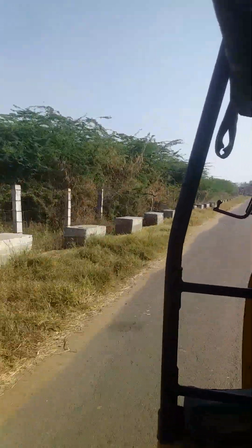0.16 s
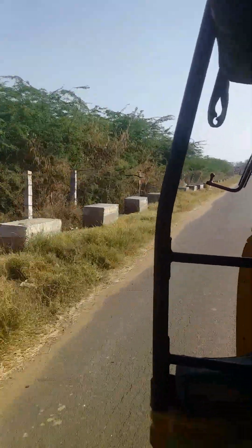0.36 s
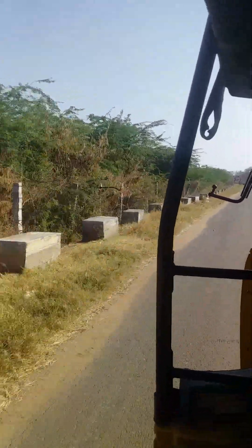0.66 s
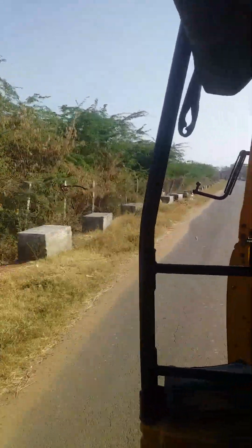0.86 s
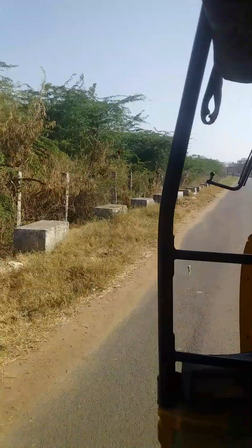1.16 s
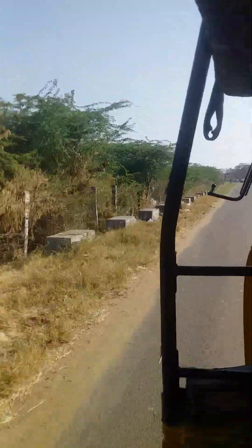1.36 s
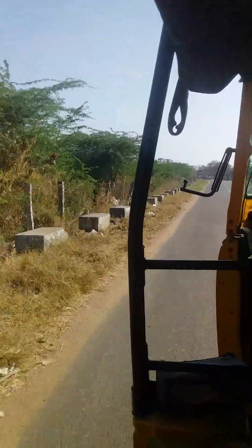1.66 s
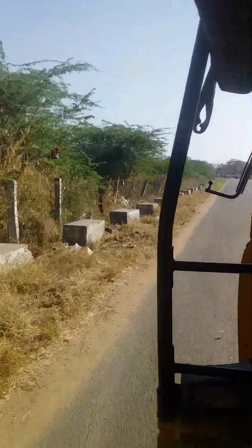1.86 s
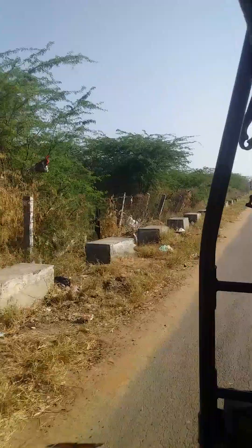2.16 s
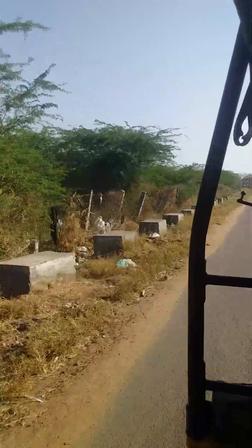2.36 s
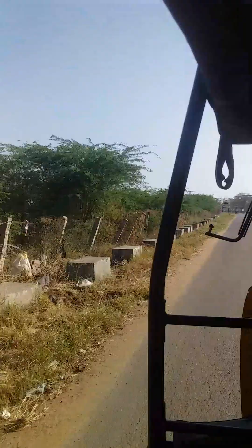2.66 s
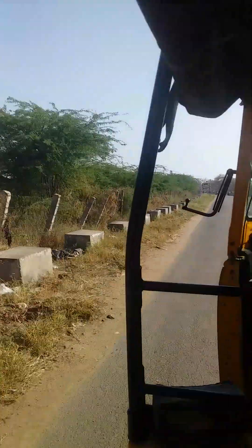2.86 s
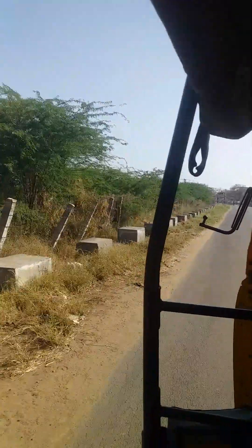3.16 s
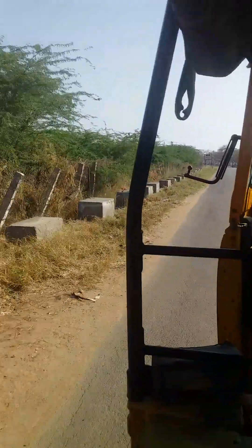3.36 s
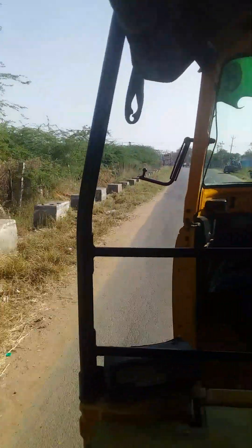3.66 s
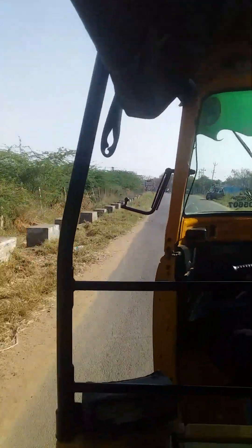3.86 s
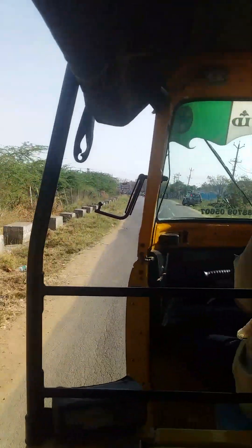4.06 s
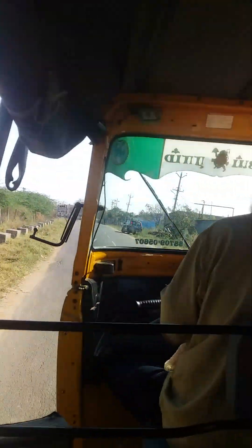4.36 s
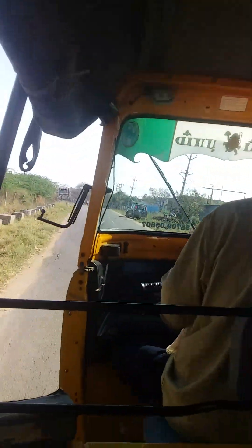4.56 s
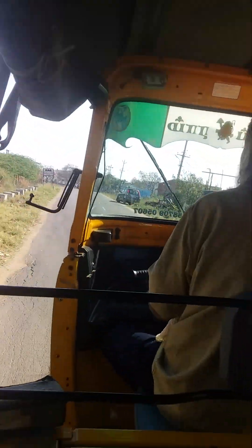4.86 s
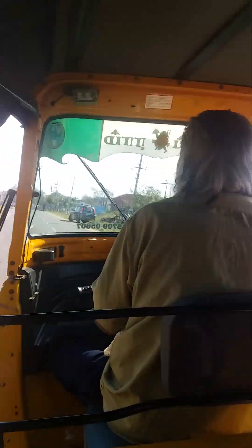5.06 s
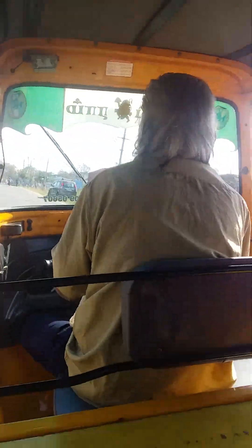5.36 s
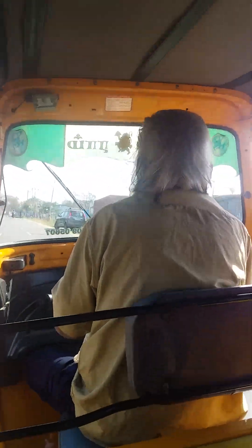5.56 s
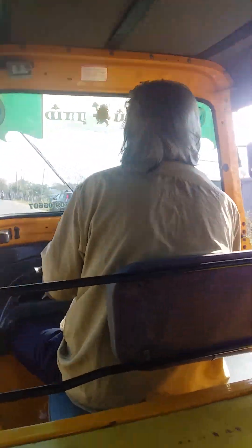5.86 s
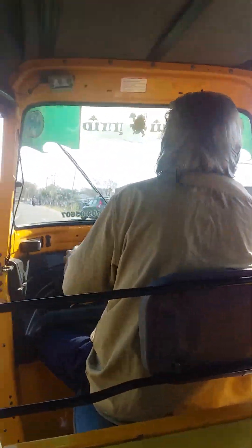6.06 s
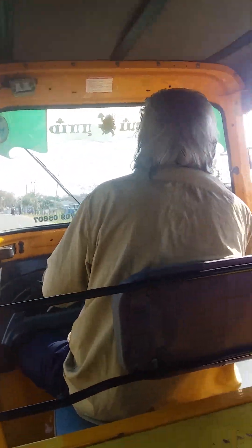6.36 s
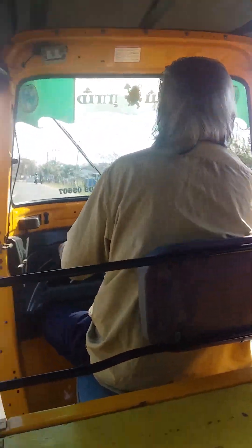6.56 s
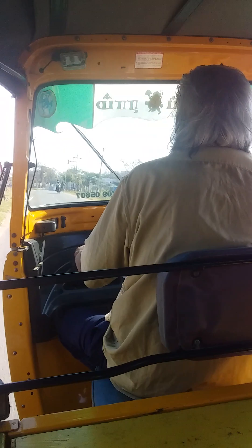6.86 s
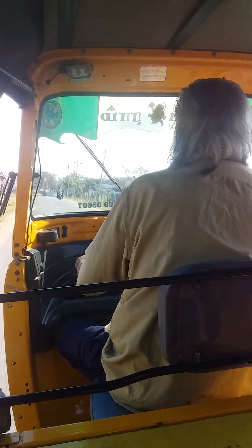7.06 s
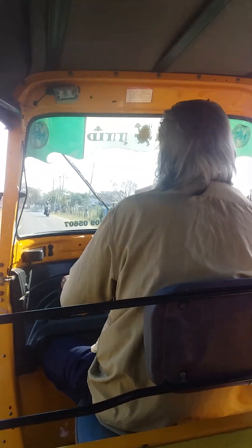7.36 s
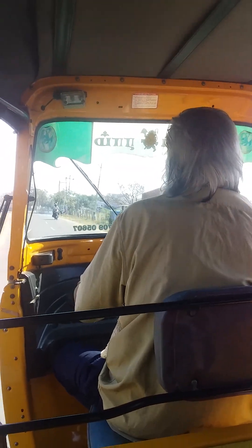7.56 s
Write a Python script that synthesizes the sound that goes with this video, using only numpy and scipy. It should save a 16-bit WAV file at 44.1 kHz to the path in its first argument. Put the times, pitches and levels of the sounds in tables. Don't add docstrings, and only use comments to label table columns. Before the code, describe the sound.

A ride of about 7.7 seconds in an open three-wheeler, heard from the cabin with a bare, close microphone. Throughout, a small single-cylinder engine fires about 23 times a second at nearly constant speed, a low buzzing drone with pulsing valve and gear clatter. Wind is nearest and loudest: a lumpy low rumble broken by abrupt slaps, dull thuds, booms and dry spits. Gusts are busy from 0.4 to 1.6 s, with a deep boom at 1.8, more slaps from 2.2 to 2.8, and a boom near 3.05. Around 4 s, clatter and thin tyre-and-chain hiss rise. Near 5 s come hard, sharp slaps and brighter metallic ticks as the microphone turns towards the panels, which ring more. A strong thump lands at 6.36, then dense buffeting from 6.5 to 7.2. Engine clatter and drone soften slightly at the end, while wind continues. Dry, rough, no reverberation.

```python
import sys
import numpy as np
from scipy import signal
from scipy.fft import rfft, irfft
from scipy.io import wavfile
from scipy.ndimage import uniform_filter1d, minimum_filter1d

SR = 44100
rng = np.random.default_rng(int(sys.argv[2]) if len(sys.argv) > 2 else 0)


def store_pcm(level_fs):
    pcm = np.round(np.clip(level_fs, -1, 1) * 32767).astype(np.int16)
    wavfile.write(sys.argv[1], SR, np.atleast_2d(pcm).T)


def boost_factor(decibels):
    exponent = np.asarray(decibels, float) / 20
    return 10 ** exponent


N = 339129
TIME = np.arange(N) / SR


def rms_one(x):
    return x / np.sqrt(np.mean(x ** 2) + 1e-20)


def at_hz(points, hz):
    point_hz, value = np.array(points).T
    return np.interp(np.log(hz), np.log(point_hz), value)


def drift(rate):
    r = np.exp(-16 * np.pi * rate / SR)
    slow = signal.lfilter([1], [1, -2 * r, r * r], rng.standard_normal(N // 8 + 4002))[4000:]
    return np.interp(np.arange(N) / 8, np.arange(len(slow)), rms_one(slow))


def band(x, low_hz, high_hz):
    return signal.sosfilt(signal.butter(2, [low_hz, high_hz], "band", fs=SR, output="sos"), x)


def low_pass(x, order, hz):
    return signal.sosfilt(signal.butter(order, hz, fs=SR, output="sos"), x)


def coloured(x, spectrum):
    hz = np.maximum(np.arange(N // 2 + 1) * SR / N, 1)
    return rms_one(irfft(rfft(x) * boost_factor(at_hz(spectrum, hz)), N))


def resonance(x, hz, width_hz):
    r = np.exp(-np.pi * width_hz / SR)
    top = np.array([1, 0, -1]) * (1 - r * r) / 2
    return signal.lfilter(top, [1, -2 * r * np.cos(2 * np.pi * hz / SR), r * r], x)


def whine():
    # frequency in Hz, level in dB.
    whine_tone = (15723, -82)
    hz, db = whine_tone
    return np.sqrt(2) * boost_factor(db) * np.sin(2 * np.pi * hz * TIME)


def sizzle(turns, beat_db, patchy_db):
    # time in seconds, level in dB.
    sizzle_course = [(0.0, -76), (3.3, -72.5), (3.9, -67), (4.6, -69.5), (7.69, -74.5)]
    # frequency in Hz, density in dB per Hz.
    sizzle_spectrum = [(8000, -35.5), (9500, -1), (10600, -9), (12600, 1.5), (14000, -8.5), (16000, -8)]
    gain_db = beat_db * np.cos(2 * np.pi * (turns - 0.1)) + patchy_db * drift(20)
    hiss = coloured(rng.standard_normal(N) * boost_factor(gain_db), sizzle_spectrum)
    return boost_factor(np.interp(TIME, *np.transpose(sizzle_course))) * hiss


def ticks(t60):
    # start in seconds, peak in dB, body in dB over the peak.
    contacts = [(0.495, -51, 15), (0.551, -50, 0), (1.2151, -55, 8), (1.3004, -58, 6), (2.2313, -54, 12),
                (2.2633, -57, 16), (2.618, -53, 23), (2.7107, -57, 15), (3.0674, -49, 13),
                (3.2684, -55, 15), (4.5281, -54.5, 8), (4.879, -51, 21), (4.9492, -44, 16),
                (4.9681, -45, 15), (5.8681, -45.5, 18), (6.4403, -51, 19), (6.5365, -49, 6),
                (7.113, -48, 20.5), (7.2514, -49, 13), (7.3766, -50, 16), (7.642, -57, 5)]
    after = np.arange(2000)
    bright, body = np.zeros((2, N + 2000))
    for s, db, body_db in contacts:
        burst = boost_factor(db - 2 - 60 * after / SR / t60)
        bright[int(s * SR) + after] += burst
        body[int(s * SR) + after] += burst * boost_factor(body_db)
    white = rng.standard_normal(N)
    return band(bright[:N] * white, 11000, 16000) + band(band(body[:N] * white, 5000, 8100), 5000, 9500)


def drone(turns, wobble_db, wander):
    # multiple of the firing rate, level in dB.
    drone_lines = [(4, -10), (5, -7.5), (7, -2), (8, -5), (9, -11), (11, 0), (13, -2), (18, -17),
                   (20, -13.5), (30, -17.5), (32, -18.5)]
    out = np.zeros(N)
    for multiple, db in drone_lines:
        gain = np.sqrt(2) * boost_factor(db + wobble_db * drift(0.62))
        cycles = multiple * turns + wander * drift(2.1) + rng.random()
        out += gain * np.sin(2 * np.pi * cycles)
    return out


def clatter(turns, beat_db, second_db, patchy_db):
    # frequency in Hz, density in dB per Hz.
    clatter_spectrum = [(300, -4), (600, -2.5), (1300, -7), (2350, -4), (2700, -11.5), (3900, -14),
                        (4900, -20), (7600, -20.5), (9000, -35.5), (10400, -62), (16000, -87.5)]
    # frequency in Hz, width in Hz, level in dB over the broad colour.
    panels = [(800, 17, -9), (1150, 27, 0.5), (1580, 84, -7), (1900, 40, 0.5), (2450, 16, -6),
              (3025, 110, -1), (3800, 95, -0.5), (5680, 120, -4.5)]
    face_cabin_s, face_swing_s, cabin_ring_db = 4.9, 0.6, 8
    beat = beat_db * np.cos(2 * np.pi * turns) + second_db * np.cos(4 * np.pi * (turns + 0.082))
    stroke = rng.standard_normal(200)[np.floor(turns + 0.5).astype(int)]
    source = rng.standard_normal(N) * boost_factor(beat * (0.5 + 0.63 * stroke) + patchy_db * drift(40))
    rings = np.zeros(N)
    for hz, width_hz, db in panels:
        rings += boost_factor(db + 0.49 * drift(6.2)) * resonance(source, hz, width_hz)
    facing = np.tanh((TIME - face_cabin_s) / face_swing_s) / 2
    return coloured(source + boost_factor(cabin_ring_db * facing) * rings, clatter_spectrum)


def airflow(lumpy_db):
    # frequency in Hz, density in dB per Hz.
    airflow_spectrum = [(25, -38.5), (45, -10), (90, 2), (210, -4.5), (460, -10.5), (840, -22.5),
                        (1700, -29.5), (4000, -67.5)]
    lumps_db = lumpy_db * drift(30) + 0.5 * drift(120)
    return coloured(rng.standard_normal(N) * boost_factor(lumps_db), airflow_spectrum)


def eddies(air_db, count):
    # peak in seconds, length in ms, rasp in dB, hiss in dB.
    slaps = [(0.502, 5.2, -21, -26), (.736, 0.79, -5.5, -6), (0.898, 0.75, -8, -9), (1.083, 4.6, -12, -9.5),
             (1.515, 7.9, -14, -41), (1.528, 2.1, -15, -17), (1.818, 2.1, -12, -26),
             (2.177, 2.2, -12.5, -15), (2.327, 6.4, -15.5, -14), (2.48, 4.8, -21, -32),
             (2.503, 2.6, -8, -13), (2.53, 3.6, -17.5, -23), (2.766, 0.92, -7.5, -19),
             (3.338, 0.43, -15, -13), (4.061, 3.2, -10.5, -15), (4.303, 5.9, -16.5, -37),
             (4.936, 3, -10.5, -8.5), (5.004, 2.1, -1.5, 1), (5.134, 6.4, -12, -18.5),
             (5.16, 2.3, -7.5, -17), (5.534, 0.69, -3.5, -19.5), (5.868, 1.54, -14, -31),
             (6.527, 3.2, -13, -19), (6.662, 8.5, -11, -16), (6.774, 7.7, -10.5, -14.5),
             (6.961, 2.4, -7, -9), (6.987, 6, -17, -24), (7.072, 1.65, -12, -18), (7.14, 2.5, -18, -38),
             (7.446, 3.2, -13.5, -11)]
    # peak in seconds, length in ms, rasp in dB, hiss in dB.
    spits = [(.45, 3.6, -18, -37), (0.482, 5.2, -16, -23.5), (.607, 5.2, -17.5, -23), (0.86, 2.7, -4, -15),
             (0.868, 1.3, -5, -13), (0.918, 1.2, -13.5, -36), (1.065, 3.4, -14.5, -21),
             (1.097, 0.91, -26, -6), (1.103, 2.3, -10.5, -35), (1.307, 1.4, -17, -31),
             (2.162, 3, -12.5, -12.5), (2.233, 1.9, -13, -21), (2.362, 2.6, -17.5, -32),
             (3.142, 4.4, -15.5, -34), (3.776, 2.2, -8.5, -27), (4.001, 0.67, -8, -32),
             (4.094, 4.7, -7, -21), (4.191, 4.6, -10, -21), (5.02, 4.7, -19, -26), (5.122, 3.2, -12, -16.5),
             (5.172, 0.34, 4, -8), (6.44, 1.8, -16, -24), (6.675, 2.7, -29, -11), (6.69, 0.86, -7, -31),
             (6.809, 0.77, -8.5, -25), (6.917, 1.9, -19, -27), (6.938, 3.8, -7, -32),
             (6.95, 2.6, -8, -11.5), (6.982, 1.25, -14, -7), (7.456, 5.3, -11.5, -49)]
    # peak in seconds, length in ms, thump in dB, rasp in dB.
    thuds = [(.17, 7, -23.5, -21.5), (0.4, 3.5, -20, -20), (0.569, 2.1, -18, -18.5), (0.591, 2.1, -12, -21),
             (0.743, 3.5, -22, -10), (0.792, 2.8, -12, -23), (0.844, 1.5, -12, -8), (.974, 2.1, -11.5, -15),
             (1.044, 3.9, -18, -13.5), (1.149, 7.9, -17, -19.5), (1.173, 3.8, -12, -12),
             (1.576, 2.4, -10.5, -12.5), (2.032, 1.43, -14.5, -8.5), (2.267, 15.5, -20.5, -18.5),
             (2.307, 7.4, -32, -17.5), (3.281, 2.4, -16, -17), (3.302, 3, -14.5, -17), (4.011, 2, -9, -18),
             (4.229, 1, -4.5, -14), (4.643, 3, -9.5, -14.5), (4.724, 2.7, -12.5, -25),
             (4.858, 2.1, -7, -12), (5.613, 4.9, -19, -17.5), (5.706, 9.1, -14, -19),
             (6.324, 5.6, -24, -12.5), (6.359, 0.94, -3.5, -2), (6.404, 15.7, -17.5, -17.5),
             (6.791, 6.7, -7.5, -18), (6.843, 2.3, -9.5, -14.5), (7.352, 3.5, -13, -20.5)]
    # peak in seconds, length in ms, thump in dB.
    booms = [(0.309, 3.5, -19), (.357, 4.1, -17.5), (0.429, 3.7, -17.5), (0.668, 2.4, -15),
             (1.791, 1.28, -3), (2.741, 8.7, -17), (2.778, 2.7, -13.5), (3.048, 1.07, -6),
             (3.106, 10, -17.5), (3.89, 11, -20), (4.102, 7.2, -11), (5.368, 2.7, -13.5), (6.287, 9, -19),
             (6.88, 1.2, -10.5), (7.013, 1.9, -10.5), (7.215, 3.3, -14), (7.423, 8.5, -10.5)]
    # peak in seconds, rasp in dB.
    flicks = [(.01, -16.5), (.043, -27), (0.069, -23.5), (.377, -22), (.49, -15), (.814, -15), (1.29, -26),
              (1.322, -22), (1.673, -18.5), (2.055, -20), (2.079, -16.5), (2.287, -24), (3.022, -15.5),
              (3.459, -18.5), (3.473, -17), (3.793, -23), (4.2, -16), (4.335, -20), (4.463, -14.5),
              (4.591, -31), (4.676, -18), (4.792, -16.5), (5.106, -8), (5.572, -22), (5.725, -17),
              (5.76, -19), (7.05, -18), (7.178, -11.5), (7.2, -16), (7.52, -18)]
    flick_ms, flick_thump_db, flick_hiss_db = 1.97, -10.5, -20.5
    flick_db, flick_spread_db = -1, 5.5
    wake_s, wake_db = 0.014, -10.5
    rows = [(s, ms, rasp + 0.5, rasp, hiss) for s, ms, rasp, hiss in slaps]
    rows += [(s, ms, rasp - 14, rasp, hiss) for s, ms, rasp, hiss in spits]
    rows += [(s, ms, thump, rasp, rasp - 23.5) for s, ms, thump, rasp in thuds]
    rows += [(s, ms, thump, thump - 17, thump - 23) for s, ms, thump in booms]
    rows += [(s, flick_ms, rasp + flick_thump_db, rasp, rasp + flick_hiss_db) for s, rasp in flicks]

    chance = rng.standard_normal((count + len(slaps), 4))
    passed = np.cumsum(boost_factor(air_db))
    share = (np.arange(count) + rng.random(count)) / count
    flick_s = np.interp(share, passed / passed[-1], TIME)
    slap_s, _, slap_rasp, _ = np.transpose(slaps)
    wakes_s = slap_s + wake_s * (0.4 + rng.exponential(1, len(slaps)))
    s = np.r_[flick_s, wakes_s]
    rasp = np.r_[np.interp(flick_s, TIME, air_db) + flick_db, slap_rasp + wake_db]
    rasp = rasp + flick_spread_db * chance[:, 0]
    ms = flick_ms * boost_factor(2.7 * np.clip(chance[:, 1], -2, 2))
    thump = rasp + flick_thump_db + 9 * chance[:, 2]
    hiss = rasp + flick_hiss_db + 3.5 * chance[:, 3]
    return rows + list(zip(s, ms, thump, rasp, hiss))


def passing_power(grid, peak_s, lasting_s, peak_power, rise, tail):
    power = np.zeros(len(grid))
    for s, spread, top in zip(peak_s, lasting_s, peak_power):
        near = slice(*np.searchsorted(grid, [s - 6 * spread * rise, s + 6 * spread * tail]))
        lag = (grid[near] - s) / spread
        power[near] += top * np.exp(-0.5 * (lag / np.where(lag > 0, tail, rise)) ** 2)
    return power


def gusts(table, shrink, rise, tail, even, crackle_db, reach, slap, bend):
    # frequency in Hz, level in dB a band.
    gust_colour = [(35, -46), (60, -12.5), (150, -2), (300, -2), (600, -5.5), (1200, -4), (2200, -11.5),
                   (4200, -27), (7000, -57)]
    edges_hz = 30 * 2 ** np.arange(0, 8.2, 0.5)
    rows = np.array(table)
    peak_s, length_ms, _, rasp_db, hiss_db = rows.T
    grid, out = TIME[::8], np.zeros(N)
    at = np.clip(peak_s * SR, 0, N - 1).astype(int)
    sign = rng.choice([-1, 1], len(rows))
    sudden = slap * np.exp(-(length_ms / 11) ** 2)
    white, crackle = rng.standard_normal((2, N)), drift(225)
    for k, (low, high) in enumerate(zip(edges_hz, edges_hz[1:])):
        hz = np.sqrt(low * high)
        bent_hz = hz if hz < 600 else 600 * (hz / 600) ** min(hz / 2200, 1) ** bend
        share = np.array([at_hz(list(zip((150, 600, 2200), unit)), bent_hz) for unit in np.eye(3)])
        fall_db = reach * max(np.log2(hz / 2200), 0) * (hiss_db - rasp_db + 10)
        level = boost_factor(rows[:, 2:] @ share + fall_db)
        lasting = length_ms / 1000 * (hz / 600) ** -shrink
        power = passing_power(grid, peak_s, lasting, level ** 2 * (1 - sudden ** 2), rise, tail)

        noise = band(white[k % 2], low, high)
        swell = np.sqrt(uniform_filter1d(noise ** 2, int(2 * SR / hz)) + 1e-12)
        noise = noise / swell ** even
        spitting = boost_factor(crackle_db * np.clip(np.log2(hz / 200), 0, 2) * crackle)
        push = np.interp(TIME, grid, np.sqrt(power)) * rms_one(noise) * rms_one(spitting)

        jumps = np.full(N, 1e-9)
        jumps[at] = sign * sudden * level * SR * np.sqrt(lasting / hz)
        push += low_pass(jumps, 4, high)
        out += boost_factor(at_hz(gust_colour, hz)) * band(push + 1e-9, low / 1.36, high * 1.55)
    return low_pass(out, 6, 7500)


def scene():
    # time in seconds, firings per second.
    engine_speed = [(0, 23.3), (2.6, 23.28), (3.6, 23.4), (5.2, 23.4), (6.1, 23.3), (7.69, 23.05)]
    # time in seconds, clatter in dB, drone in dB, steady airflow in dB.
    cabin_levels = [(0.0, -39, -32.5, -21), (0.211, -40, -39.5, -25.5), (0.77, -33.5, -30.5, -20.5),
                    (1.541, -37, -32.5, -27.5), (2.5, -36.5, -31.5, -25), (3.45, -34, -33, -25),
                    (4.0, -31.5, -33, -21.5), (4.4, -33, -33, -21.5), (4.769, -33.5, -31, -20),
                    (5.299, -35.5, -32.5, -25), (6.059, -36.5, -32, -27.5), (6.85, -35, -36, -19),
                    (7.69, -41, -37, -29)]
    first_turn = 0.57
    turns = first_turn + np.cumsum(np.interp(TIME, *np.transpose(engine_speed))) / SR
    s, *columns = np.transpose(cabin_levels)
    clatter_db, drone_db, air_db = [np.interp(TIME, s, column) for column in columns]
    engine = boost_factor(clatter_db) * clatter(turns, beat_db=1.7, second_db=0.5, patchy_db=0.8)
    engine += boost_factor(drone_db) * drone(turns, wobble_db=1.5, wander=0.08)
    engine += sizzle(turns, beat_db=0.5, patchy_db=0.6)
    wind = boost_factor(air_db) * airflow(lumpy_db=2.5)
    wind += gusts(eddies(air_db, count=20), shrink=0.42, rise=0.6, tail=1.3, even=0.85,
                  crackle_db=1.2, reach=0.25, slap=0.34, bend=0.23)
    return (engine + wind + ticks(t60=0.043) + whine())[None]


def top_cut(x):
    return signal.sosfilt(signal.butter(12, 16500, fs=SR, output="sos"), x)


def record(dry):
    ceiling, top_hz = 1.0, 15800
    x = signal.sosfilt(signal.butter(4, 46, "high", fs=SR, output="sos"), dry)
    gain = minimum_filter1d(ceiling / np.maximum(np.abs(x), ceiling), size=241)
    gain = uniform_filter1d(uniform_filter1d(gain, size=120), size=120)
    edge = signal.ellip(14, 0.5, 70, top_hz, fs=SR, output="sos")
    return top_cut(signal.sosfilt(edge, x * gain))


dry = scene()
out = record(dry)
store_pcm(out)
```